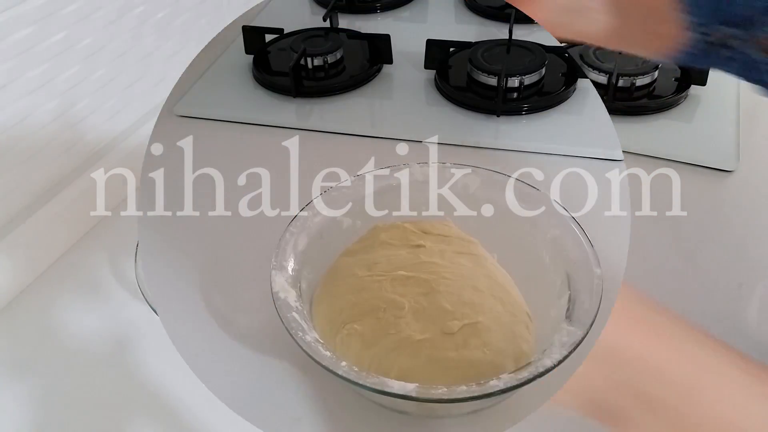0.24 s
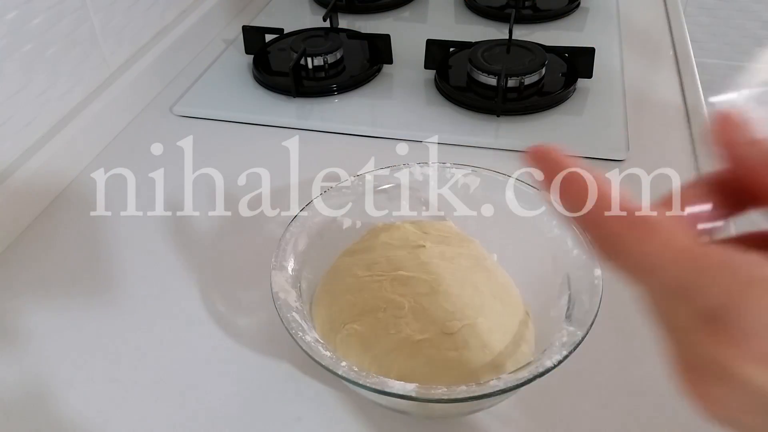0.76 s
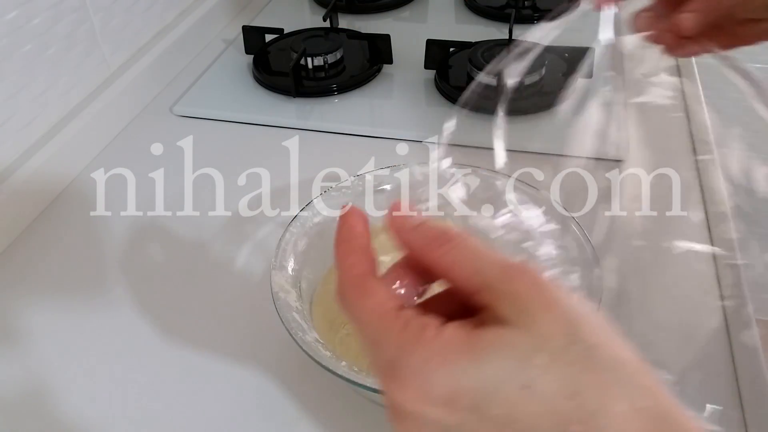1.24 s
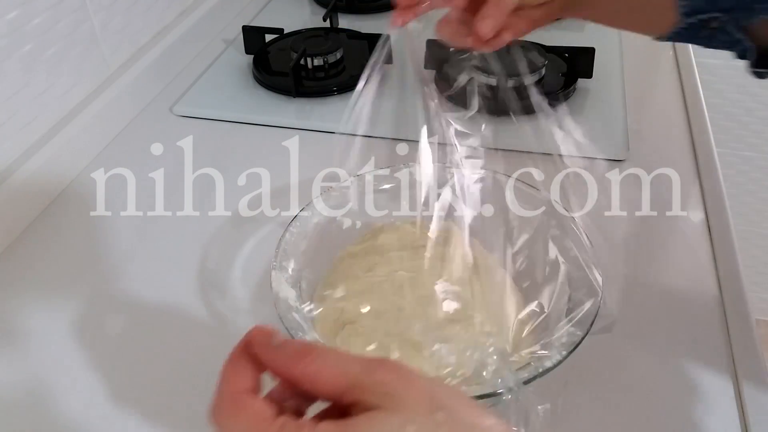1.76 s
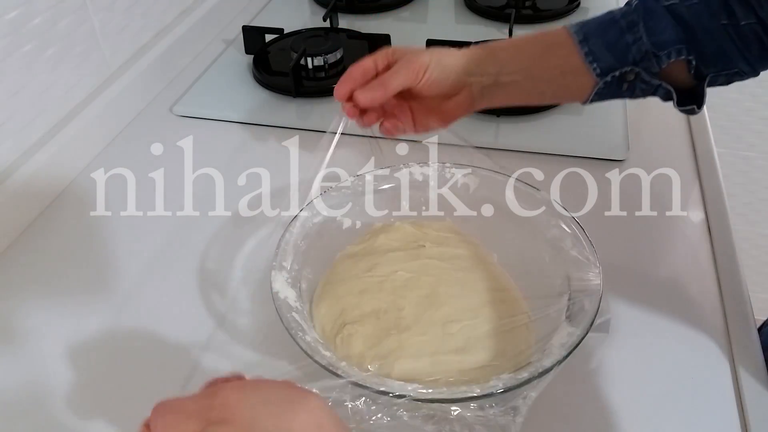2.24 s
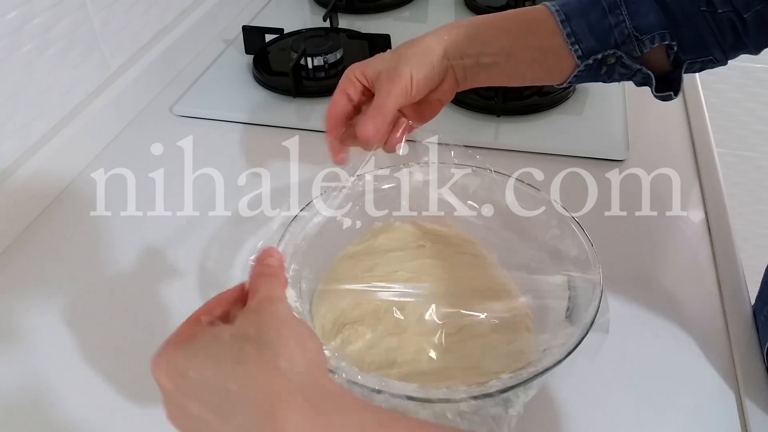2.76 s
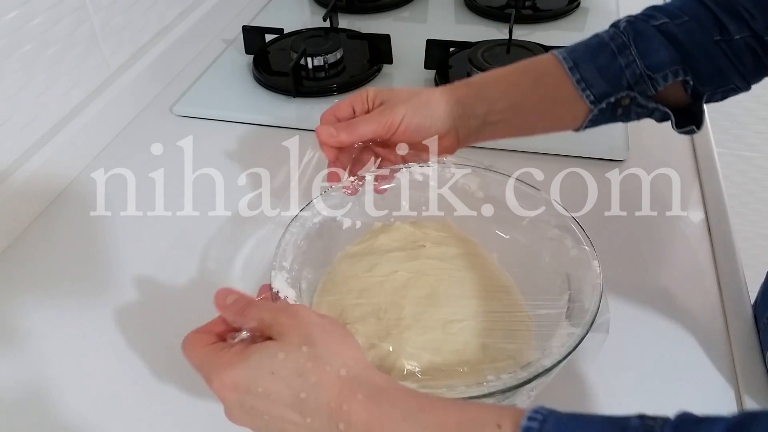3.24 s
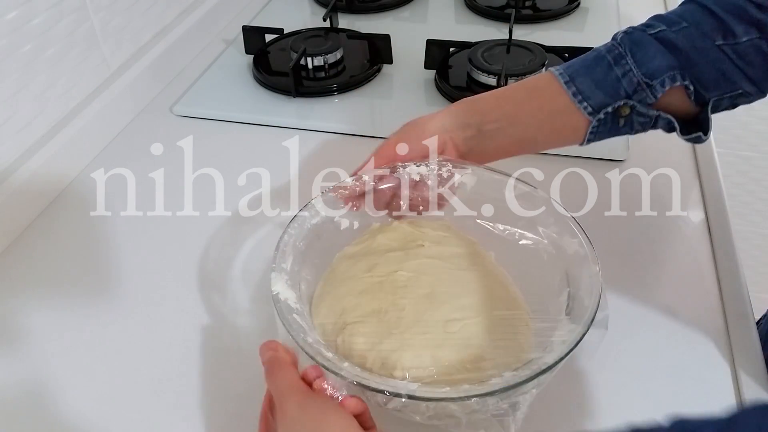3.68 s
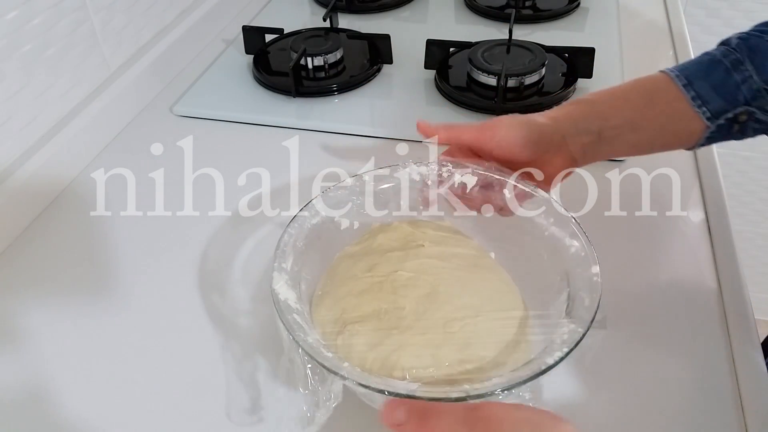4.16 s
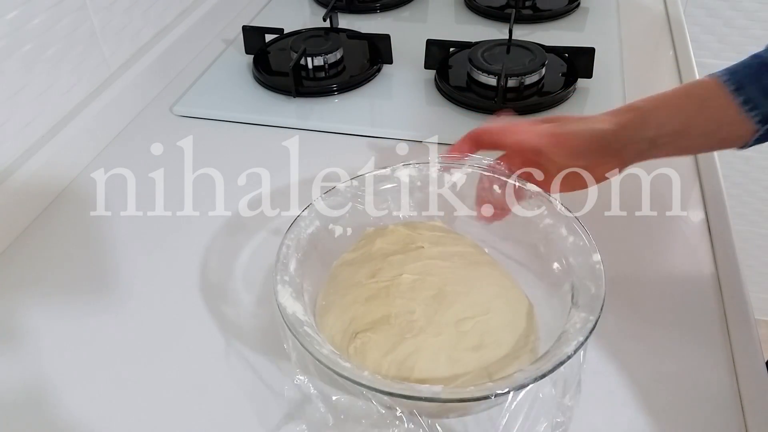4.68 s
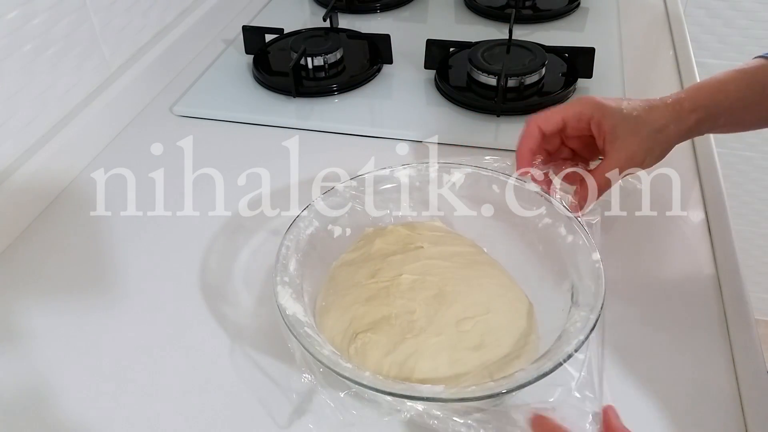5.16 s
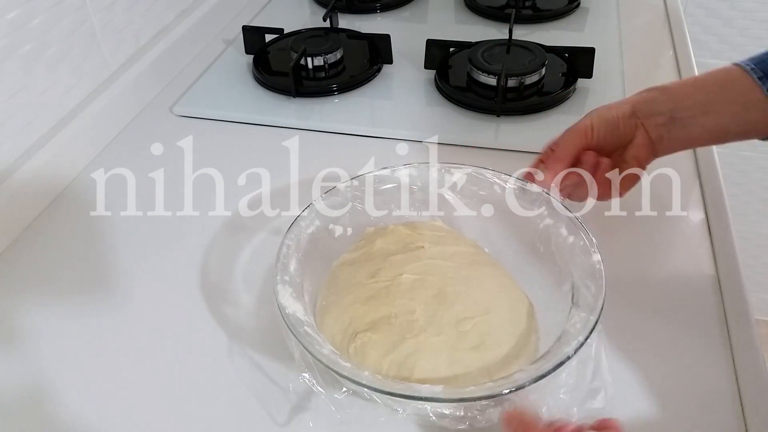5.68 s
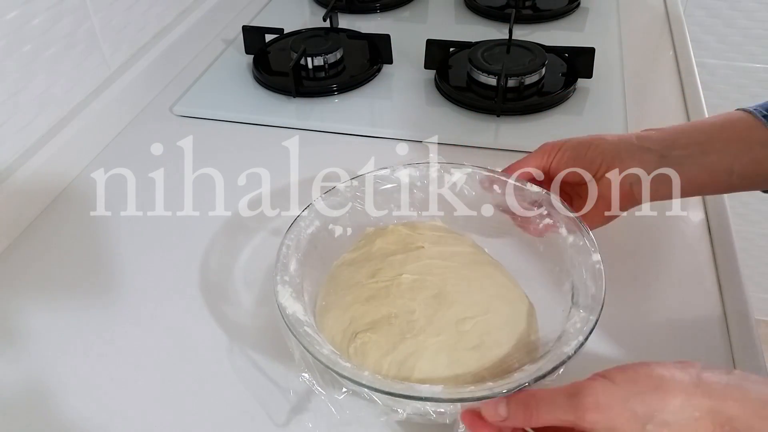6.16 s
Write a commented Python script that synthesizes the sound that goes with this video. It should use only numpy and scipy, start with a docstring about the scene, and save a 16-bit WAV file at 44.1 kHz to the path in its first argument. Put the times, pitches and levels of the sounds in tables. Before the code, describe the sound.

Cling film crinkles, ticks and pops as hands stretch and press it over a glass bowl in a kitchen, over a low hum.

```python
"""A kitchen counter, a small two-port microphone near a glass bowl. Cling film is drawn over the bowl,
stretched and pressed round the rim. Each stroke of the hands buckles its creases in a fine crackle;
slack folds tick, taut patches pop and ring briefly, the film rubs on the rim and the hands bump softly.
Counter and walls answer, an appliance hums across the room, and the microphone hisses faintly."""
import sys
import numpy as np
from scipy import signal
from scipy.fft import rfft, irfft
from scipy.io import wavfile
from scipy.ndimage import uniform_filter1d

SR = 44100
rng = np.random.default_rng(int(sys.argv[2]) if len(sys.argv) > 2 else 0)


def to_wav(sig):
    """Store sig (one row per channel, or 1-D mono) as 16-bit WAV at the path in sys.argv[1].

    Samples outside -1..1 are clipped; the rate is SR.
    """
    pcm = np.clip(np.atleast_2d(sig), -1, 1) * 32767
    pcm = np.round(pcm).astype(np.int16)
    wavfile.write(sys.argv[1], SR, pcm.T)  # frames by channels


N = 283122

# The spectrum of a crease buckling. Each row: frequency in Hz, relative level in dB.
CREASE_SPECTRUM = [(200, -2), (1000, -35), (3500, -5), (6000, -16), (10000, 1), (16500, 6.5)]


def crinkle(crackle_db=-3, rustle_db=-1, gentle_db=-60, stray_db=-4.5, stray_follow=0.77):
    """Fine crackle and duller rustle follow the hands; stray larger creases stand out in gentle strokes."""
    # The loose sheet rustling. Each row: frequency in Hz, relative level in dB.
    sheet_spectrum = [(60, 8), (250, -26.5), (500, 3.5), (850, 5.5), (1300, -4), (2100, -5), (3500, -12),
                      (5500, -12.5), (9000, -6.5), (16000, -57)]
    crackle = unit(colour(creases(per_s=1700, spread_db=4, scatter_db=29, clump_db=2.5), CREASE_SPECTRUM))
    stray = unit(colour(creases(per_s=37, spread_db=2, scatter_db=6.5, clump_db=-1), CREASE_SPECTRUM))
    rustle = unit(colour(creases(per_s=1200, spread_db=5, scatter_db=7.5, clump_db=2), sheet_spectrum))
    creasing, rustling = handling()
    straying = amp(gentle_db + stray_db) * (creasing / amp(gentle_db)) ** stray_follow
    return amp(crackle_db) * crackle * creasing + stray * straying + amp(rustle_db) * rustle * rustling


def creases(per_s, spread_db, scatter_db, clump_db, clump_samples=350):
    """Clicks from all over the film, most small, a few large, coming in little avalanches."""
    clumps = unit(uniform_filter1d(rng.standard_normal(N), clump_samples))
    strength = amp(spread_db * np.minimum(rng.exponential(1, N), 4) + clump_db * clumps)
    clicks = strength * (rng.random(N) < per_s / SR) * rng.choice([-1, 1], N)
    return unit(clicks * sides(scatter_db * rng.standard_normal(N)))


def handling(grip_db_per_s=332, let_go_db_per_s=213):
    """Strength of crackle and rustle: each stroke swells up to its start, holds, then dies away."""
    # The hands lift, pull, press and tuck the film.
    # Each row: start in seconds, length in seconds, crackle and rustle in relative dB.
    strokes = [(0, 0.85, -94, -99), (0.893, 0.37, -80.5, -99), (1.387, 0.85, -71, -86),
               (1.57, 0.26, -60.5, -73.5), (2, 0.26, -57, -75), (2.133, 0.017, -42.5, -55),
               (2.29, 1, -63.5, -73.5), (3.32, 0.28, -56.5, -66.5), (3.72, 0.042, -44, -49.5),
               (3.842, 0.028, -35.5, -47), (3.95, 1, -74, -73), (4.222, 0.54, -55, -67.5),
               (4.339, 0.14, -42.5, -52.5), (4.567, 0.048, -40.5, -45.5), (4.937, 0.63, -54, -62.5),
               (5.54, 0.87, -51, -63.5), (5.24, 0.025, -45, -63), (5.392, 0.03, -37.5, -58),
               (5.573, 0.21, -50, -69), (5.659, 0.043, -35.5, -51.5), (5.803, 0.13, -40, -55),
               (6.304, 0.022, -43, -68)]
    t = np.arange(N) / SR
    crackle_power, rustle_power = np.zeros((2, N))
    for start, length, crackle_db, rustle_db in strokes:
        ramps_db = np.minimum(grip_db_per_s * (t - start), let_go_db_per_s * (start + length - t))
        envelope = amp(np.clip(ramps_db, -100, 0))
        crackle_power += (amp(crackle_db) * envelope) ** 2
        rustle_power += (amp(rustle_db) * envelope) ** 2
    return np.sqrt(crackle_power), np.sqrt(rustle_power)


def snaps(tick_db=-1, pop_db=-3, ring_db=2, tick_left_db=2, pop_pan=0.1, tick_room_db=-1):
    """Each fold gives a bright tick and a hollow pop, straight to the microphone and out into the room."""
    # A patch of film popping. Each row: frequency as a multiple of its pitch, relative level in dB.
    pop_spectrum = [(.08, -65), (.3, -9.5), (.55, 4), (.85, 2), (1, -2.5), (1.3, 3), (1.7, -3),
                    (2.5, -13.5), (4, -5.5), (6, -23), (16, -10)]
    straight, thrown = np.zeros((2, 2, N))
    for s, crease_db, sheet_db, hz, pan_db, room_db in folds():
        tick = amp(crease_db + tick_db) * buckle(CREASE_SPECTRUM, 0.98, fall_s=0.00058, rise_s=0.00032)
        flip = amp(pop_db) * buckle(pop_spectrum, hz, fall_s=0.00095, rise_s=0.00025)
        pop = amp(sheet_db) * (flip + amp(ring_db) * ring(hz))
        snap = np.outer(sides(pan_db + tick_left_db), tick) + np.outer(sides(pop_pan * pan_db), pop)
        start = s - len(tick) / 2 / SR
        add(straight, start, snap)
        add(thrown, start, amp(room_db) * (amp(tick_room_db) * tick + pop))
    return straight, thrown


def folds(slack_pop_db=-18, slack_hz=850, slack_room_db=-3, taut_room_db=0.5):
    """Every fold that flips: taut patches sound the sheet, slack creases barely do."""
    # Taut patches. Each row: time in seconds, tick and pop in relative dB, pitch in Hz, leftward pan in dB.
    taut_patches = [(3.0228, -33.5, -46.5, 940, -6), (3.5624, -53, -46.5, 950, 12),
                    (3.6142, -40, -45, 890, 15), (3.6753, -27, -30, 780, 19), (3.6773, -35.5, -40, 1970, 7),
                    (3.7473, -31, -34.5, 1080, 9), (3.809, -25.5, -33.5, 750, 18),
                    (3.8119, -18, -30.5, 1900, 9), (4.3217, -34.5, -43.5, 786, -10),
                    (4.3366, -38, -40, 810, 10), (4.3555, -29, -39, 930, -9),
                    (4.3798, -25.5, -37.5, 1490, 1), (4.446, -32.5, -50, 1200, 15),
                    (4.5125, -39, -33, 584, 14), (4.5204, -37, -55, 520, 6), (4.5517, -24.5, -26, 855, -23),
                    (4.554, -32, -31.5, 1390, -6), (4.6305, -31.5, -43, 1300, -4),
                    (4.6427, -33, -43, 1200, -17), (4.7343, -29.5, -36.5, 1070, -20),
                    (5.3545, -29.5, -41.5, 1030, -7), (5.9268, -32.5, -47, 940, 11)]
    # Slack creases. Each row: time in seconds, tick in relative dB, leftward pan in dB.
    slack_creases = [(0.862, -60.5, -18), (1.5213, -44, -8), (1.5843, -47, -10), (1.7428, -37, -2),
                     (1.7553, -33.5, 12), (1.773, -44, 3), (1.801, -41, 5), (1.8723, -49, 7),
                     (1.9839, -43.5, -4), (2.0678, -40, -1), (2.1235, -35, -4), (2.1313, -32, 6),
                     (2.318, -41.5, -1), (2.5294, -39.5, 9), (2.6416, -43, -3), (2.6818, -45.5, 11),
                     (2.8537, -39.5, -2), (3.0192, -42, -2), (3.3148, -42.5, -2), (3.7945, -33, 9),
                     (3.8773, -30, 11), (4.4189, -40, 5), (4.572, -27, 7), (4.9016, -41.5, -4),
                     (4.968, -35.5, -13), (5.0843, -29.5, -6), (5.1088, -35.5, -9), (5.2226, -34, 5),
                     (5.3022, -28.5, -5), (5.3459, -29, 10), (5.5001, -40, -5), (6.3663, -37, 7)]
    taut = [(*row, taut_room_db) for row in taut_patches]
    slack = [(s, db, db + slack_pop_db, slack_hz, pan_db, slack_room_db) for s, db, pan_db in slack_creases]
    return taut + slack


def buckle(table, frequency_scale, fall_s, rise_s, size=1024):
    """Slips pile up, a fold flips halfway through, the motion dies; limp film has no sharp resonances."""
    t = (np.arange(size) - size // 2) / SR
    envelope = np.exp(np.where(t < 0, t / rise_s, -t / fall_s))
    slips = np.fft.fft(rng.standard_normal(size) * envelope)
    hz = abs(np.fft.fftfreq(size, 1 / SR))
    burst = np.fft.ifft(slips / abs(slips) * causal(spectrum(table, hz / frequency_scale))).real
    return burst / np.sqrt(np.sum(burst ** 2) / (0.0025 * SR))  # the energy of 2.5 ms at rms 1


def ring(hz, decay_cycles=2.7, size=1024):
    """A taut patch flips halfway through, then swings a few times."""
    cycles = np.maximum(np.arange(size) - size // 2, 0) / SR * hz
    return np.sin(2 * np.pi * cycles) * np.exp(-cycles / decay_cycles)


def rim_drag(width_hz=140, left_db=3):
    """A short low rub over the rim: uneven slips shake the sheet, whose pitch rises as it tightens."""
    # Each row: time in seconds, pitch in Hz, level in dB.
    pull = [(4.28, 239.6, -76), (4.37, 261.5, -56), (4.45, 321.1, -54), (4.53, 493.7, -54),
            (4.59, 532.3, -49), (4.7, 521.5, -75)]
    slips = rng.standard_normal(N) + 1j * rng.standard_normal(N)
    shudder = signal.sosfilt(signal.butter(2, width_hz / 2, fs=SR, output="sos"), slips)
    phase = 2 * np.pi * np.cumsum(curve(pull)) / SR
    rub = unit((shudder * np.exp(1j * phase)).real)
    return np.outer(sides(left_db), rub * amp(curve(pull, column=2)))


def hand_bumps(rise_s=0.039):
    """Hands meet bowl and counter in dull, quickly damped thuds."""
    # Each row: start in seconds, relative level in dB, pitch in Hz, seconds to fall by 60 dB.
    bumps = [(2.133, -34.5, 174.2, 0.2), (3.565, -21, 98, 0.11), (3.808, -42, 123.4, 0.47),
             (4.512, -24, 547, 0.06)]
    t, out = np.arange(SR // 2) / SR, np.zeros((2, N))
    for s, db, hz, t60 in bumps:
        envelope = amp(db - 60 * t / t60) * (1 - np.exp(-t / rise_s))
        add(out, s, envelope * np.sin(2 * np.pi * hz * t))
    return out


def faint_click(s=0.231, db=-45, fall_s=0.0038):
    """One small dry click in the quiet before the film arrives."""
    out = np.zeros((2, N))
    add(out, s, amp(db) * np.exp(-np.arange(SR // 20) / SR / fall_s))
    return out


def kitchen(sound, near_db=-2, near_s=0.0089, room_db=1, size=192):
    """Each crease has its own paths, so echoes are diffuse: first off bowl and counter, then the walls."""
    # Each row: frequency in Hz, seconds for the room to fall by 60 dB.
    reverb_times = [(200, 0.33), (1000, 0.35), (4000, 0.5), (10000, 0.13), (16000, 0.28)]
    frames = dict(fs=SR, nperseg=size, noverlap=size - size // 4)
    hz, age_s, source = signal.stft(sound, **frames)
    age_s = age_s[age_s < 0.5]
    near = np.exp(-2 * age_s / near_s) * (age_s > 0)
    tail = amp(-60 * age_s / spectrum(reverb_times, hz)[:, None]) ** 2 * (age_s > 0)
    lingering = amp(near_db) ** 2 * near / near.sum() + amp(room_db) ** 2 * tail / tail.sum(1)[:, None]
    power = signal.fftconvolve(abs(source) ** 2, lingering[None], axes=2)[..., :source.shape[2]]
    noise = signal.stft(rng.standard_normal((2, N)), **frames)[2]
    echoes = noise * np.sqrt(abs(power) / np.mean(abs(noise) ** 2))
    return signal.istft(echoes, **frames)[1][:, :N]


def appliance(rumble_db=1, steady=0.65, left_db=2.5):
    """A low rumble with wavering tones, heard from across the room."""
    # Each row: frequency in Hz, relative level in dB.
    rumble_spectrum = [(20, -28), (35, -17.5), (45, -13.5), (58, -17), (75, 1.5), (120, -1), (190, -3.5),
                       (225, -11), (330, -9.5), (600, -18.5), (1200, -32), (2400, -41), (6000, -73.5)]
    # Each row: time in seconds, relative level in dB.
    rumble_level = [(0, -56.5), (0.7, -58), (2.1, -52.5), (3.2, -55), (3.65, -50), (4.1, -54.5),
                    (5.3, -51.5), (6.42, -53)]
    # How alike far sound is at the two ports. Each row: frequency in Hz, correlation from 0 to 1.
    port_likeness = [(60, 1), (140, 0.75), (300, 0.55), (640, 0.26), (1400, 0), (4000, .05)]
    # Each row: pitch in Hz, relative level in dB, width in Hz, share of the swell from 0 to 1.
    hum_tones = [(93.7, -65, 20, 0), (145.8, -64, 15, 0.2), (178.7, -55.5, 7.8, 1), (337.1, -63, 2.4, 0.63),
                 (468, -70.5, 18, 0.38), (548, -79, 7.9, 0.3), (584, -83.5, 4.1, 0.1)]
    # The hum swells and sinks slowly. Each row: time in seconds, gain in dB.
    swell = [(0, -1.5), (0.9, -7.5), (2.3, 3), (3.2, -6), (4.5, -5.5), (5.4, 4), (6.42, 1)]
    hz, t = np.fft.rfftfreq(N, 1 / SR), np.arange(N) / SR
    left, unrelated = rfft(rng.standard_normal((2, N)))
    likeness = spectrum(port_likeness, hz)
    right = likeness * left + np.sqrt(1 - likeness ** 2) * unrelated
    rumble = unit(irfft(np.array([left, right]) * amp(spectrum(rumble_spectrum, hz)), N))
    hum = np.zeros(N)
    for pitch, db, width, share in hum_tones:
        waver = unit(irfft(rfft(rng.standard_normal(N)) / (1 + (2 * (hz - pitch) / width) ** 2), N))
        tone = steady * np.sin(2 * np.pi * (pitch * t + rng.random()))
        hum += amp(db + share * curve(swell)) * unit(waver + tone)
    return (amp(rumble_db + curve(rumble_level)) * rumble + hum) * sides(left_db)[:, None]


def amp(db):
    return 10 ** (np.asarray(db) / 20)


def unit(x):
    """Scales to rms 1."""
    return x / np.sqrt(np.mean(x ** 2) + 1e-20)


def spectrum(table, hz, column=1):
    """Reads one column of a table over log frequency."""
    rows = np.array(table, float)
    return np.interp(np.log(hz + 1e-9), np.log(rows[:, 0]), rows[:, column])


def curve(table, column=1):
    """Reads one column of a table at every sample."""
    rows = np.array(table, float)
    return np.interp(np.arange(N) / SR, rows[:, 0], rows[:, column])


def add(mix, s, sound):
    """Mixes a sound in, starting at s seconds."""
    part = mix[:, max(round(s * SR), 0):][:, :sound.shape[-1]]
    part += sound[..., :part.shape[1]]


def sides(left_db):
    """Left and right gains of mean power 1, the left louder by left_db."""
    pair = amp(np.array([left_db, -left_db]) / 2)
    return pair / np.sqrt(np.mean(pair ** 2, 0))


def causal(gain_db):
    """Minimum-phase response with these gains, given for every FFT bin."""
    return np.exp(np.conj(signal.hilbert(np.log(amp(gain_db)))))


def colour(x, table, column=1, size=2048):
    """Filters with the gains of a table."""
    response = causal(spectrum(table, abs(np.fft.fftfreq(size, 1 / SR)), column))
    impulse = np.fft.ifft(response).real[None, :size // 2]
    return signal.oaconvolve(x, impulse, axes=1)[:, :x.shape[1]]


def per_port(x, table):
    """Colours left and right each by its own column."""
    return np.vstack([colour(x[:1], table, column=1), colour(x[1:], table, column=2)])


def scene(right_lag_samples=3):
    """Film and bowl close by, reaching the left port first, with the kitchen behind them."""
    # Hollow resonances of the air in the covered bowl. Each row: frequency in Hz, gain in dB.
    bowl_air = [(350, -3.5), (560, -3.5), (800, -2), (1050, -2.5), (1450, 1), (1850, -1), (2250, 2),
                (2750, 3.5), (3400, -4), (6000, 5), (9000, 2)]
    # The colour of the microphone ports. Each row: frequency in Hz, left and right gain in dB.
    port_colour = [(300, 1, -1), (800, 3, -3), (2600, 2, -3), (3800, 5, -2), (5200, -2, -3), (6500, -7, -7),
                   (7500, -3, -11), (8500, 3, -13), (9500, 4, -13), (11000, 3, -8), (12600, 0, -1),
                   (14000, 0, 6), (15600, 1, 6.5)]
    straight, thrown = (colour(x, bowl_air) for x in snaps())
    crackle = crinkle()
    left, right = straight + crackle
    direct = np.array([left, np.roll(right, right_lag_samples)])
    film = per_port(direct + kitchen(thrown + crackle), port_colour)
    return film + rim_drag() + hand_bumps() + appliance() + faint_click()


def record(dry, top_hz=15850):
    """The microphone adds its faint hiss, and the highest treble is cut off."""
    # Each row: frequency in Hz, left and right level in relative dB.
    hiss_spectrum = [(950, -39, -41.5), (2040, -43, -34), (2600, -12.5, -31), (2872, -3.5, -7),
                     (3160, -11, -34.5), (3655, 4, -10.5), (4000, -1.5, -16), (4520, -14.5, -20),
                     (5130, -33.5, -34), (6300, -39, -37), (9360, -76, -49), (12100, -32.5, -33),
                     (14250, -22, -20.5)]
    # Each row: time in seconds, level in dB.
    hiss_level = [(0, -63.5), (1, -65), (2, -59.5), (4, -61), (6.42, -58)]
    hiss = amp(curve(hiss_level)) * unit(per_port(rng.standard_normal((2, N)), hiss_spectrum))
    lowpass = signal.firwin(301, top_hz, window=("kaiser", 8), fs=SR)
    return signal.oaconvolve(dry + hiss, lowpass[None], "same", axes=1)


dry = scene()
out = record(dry)
to_wav(out)
```